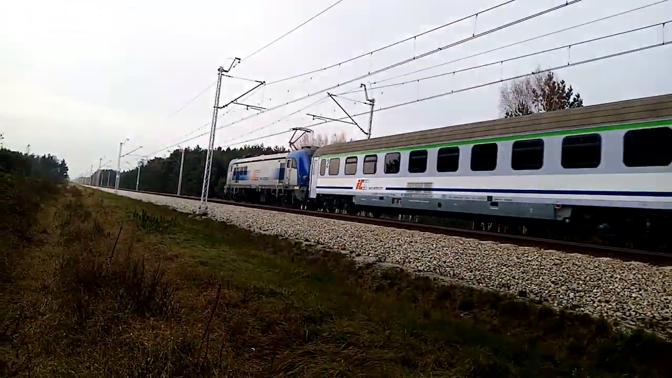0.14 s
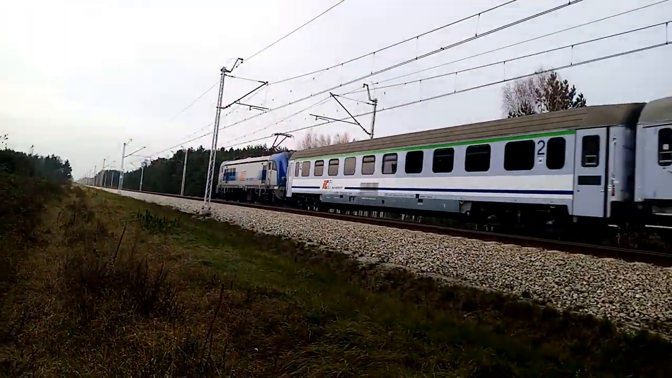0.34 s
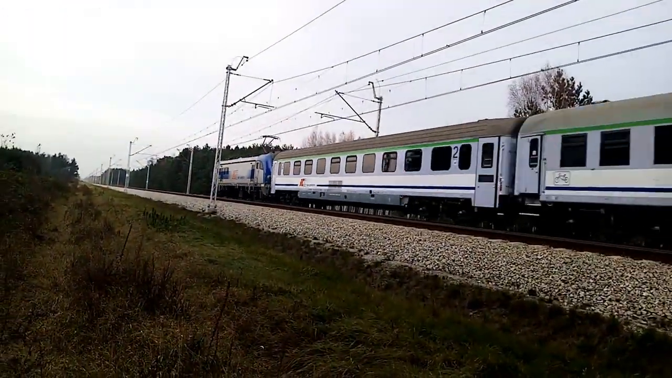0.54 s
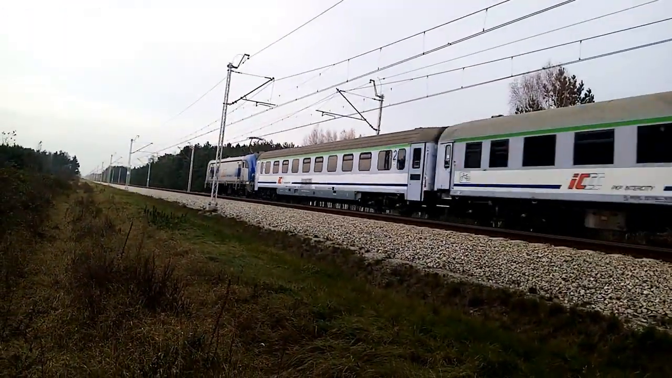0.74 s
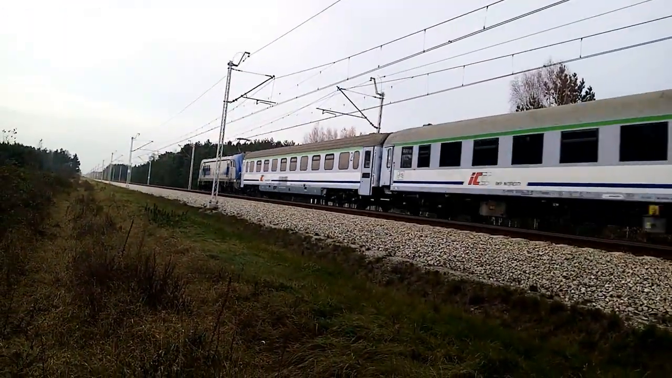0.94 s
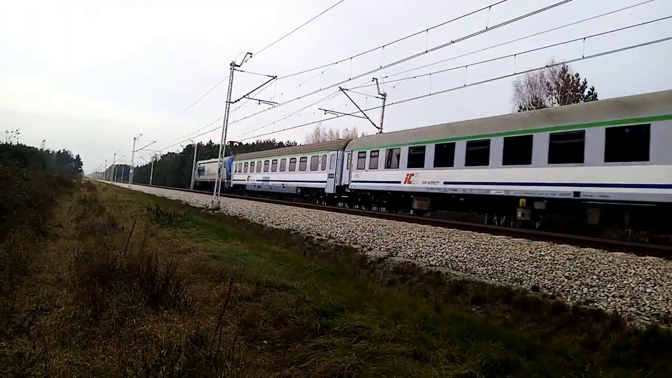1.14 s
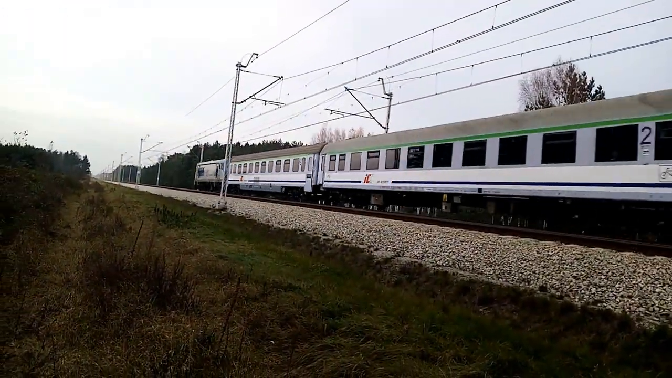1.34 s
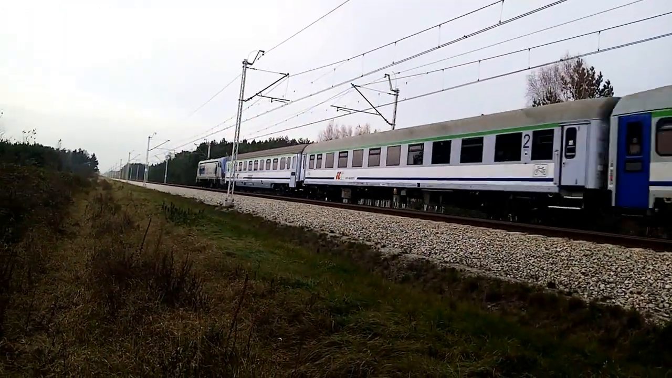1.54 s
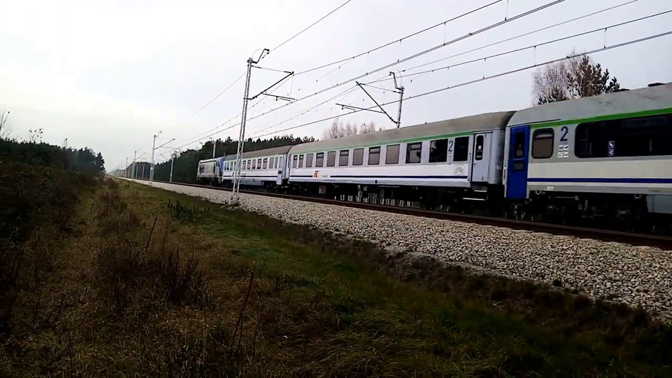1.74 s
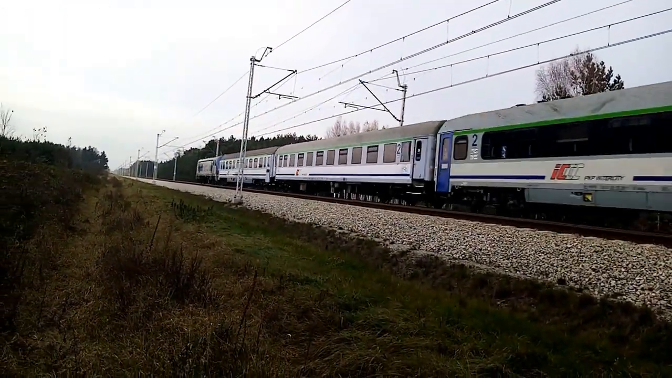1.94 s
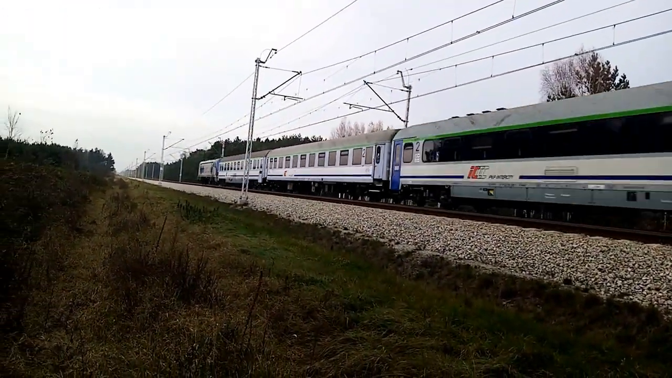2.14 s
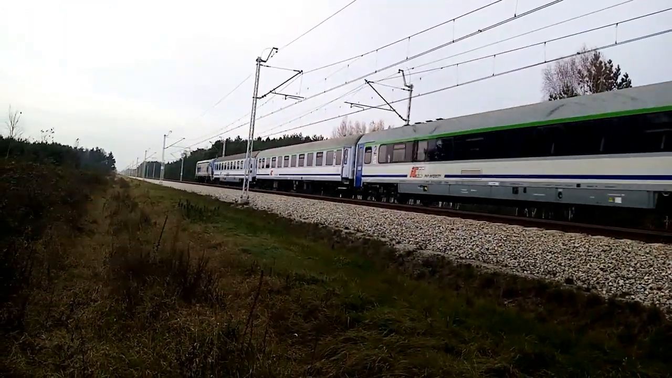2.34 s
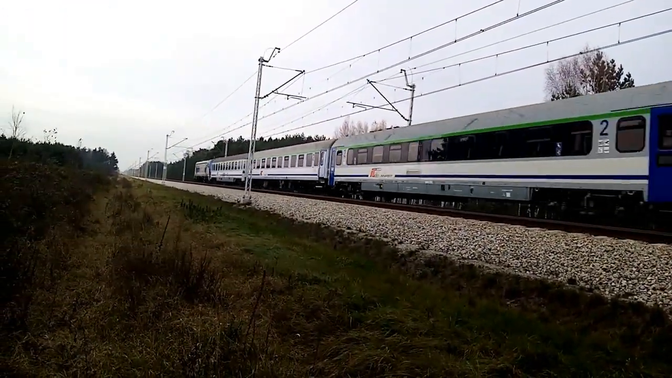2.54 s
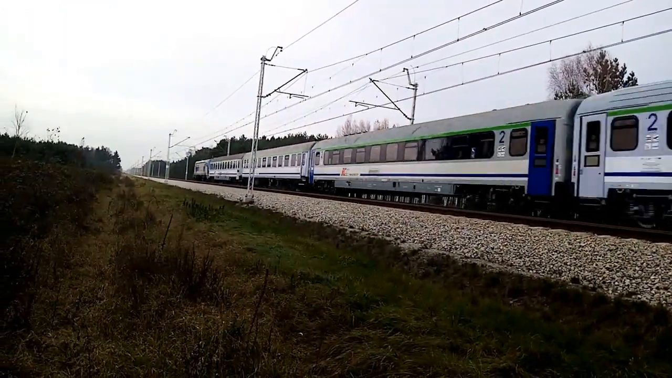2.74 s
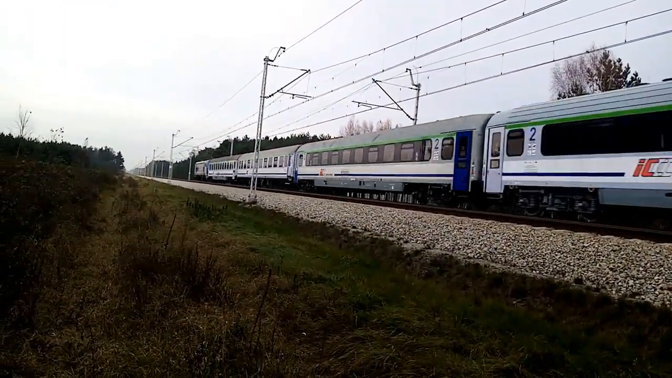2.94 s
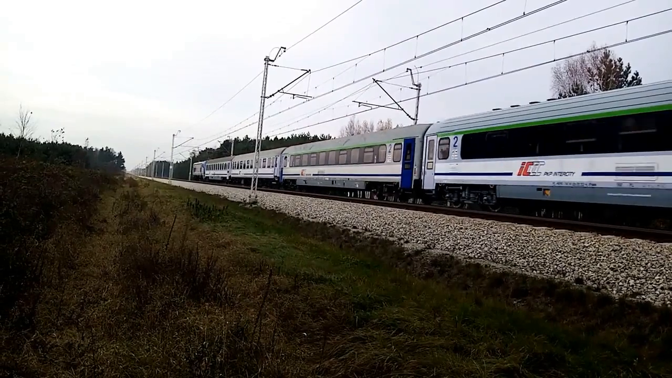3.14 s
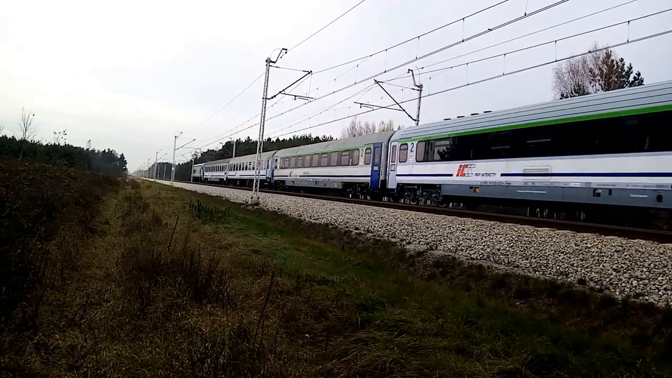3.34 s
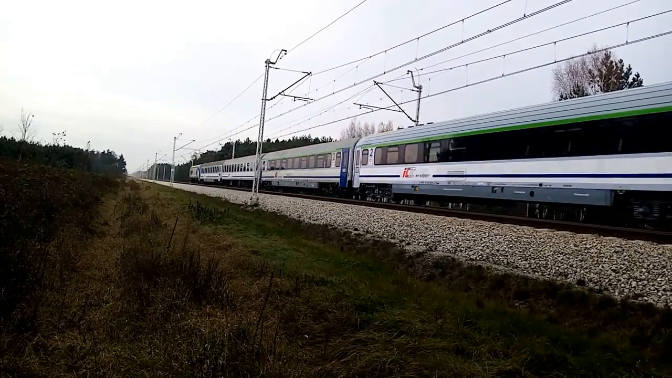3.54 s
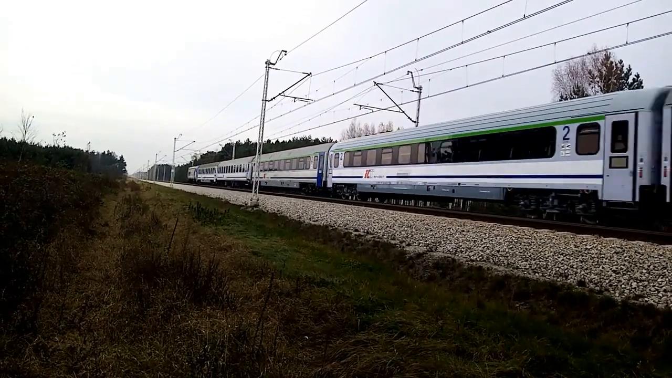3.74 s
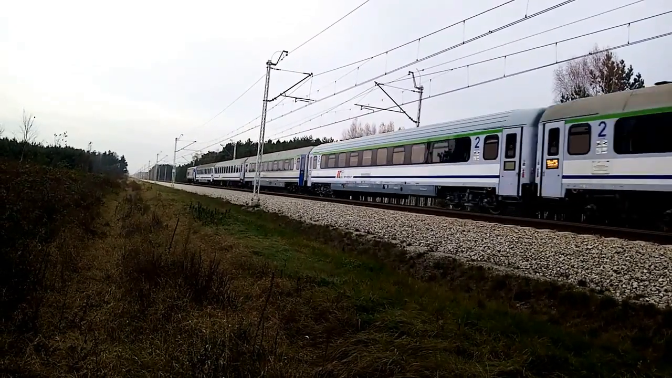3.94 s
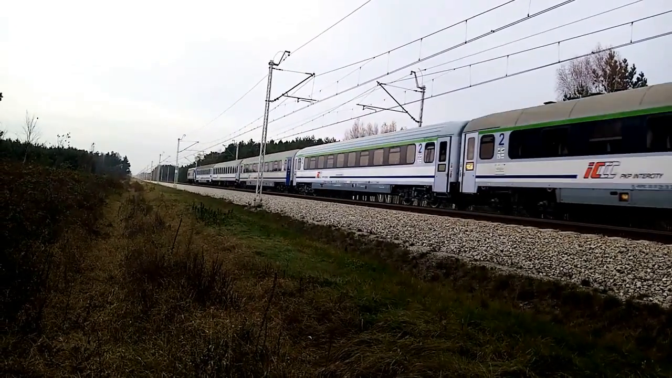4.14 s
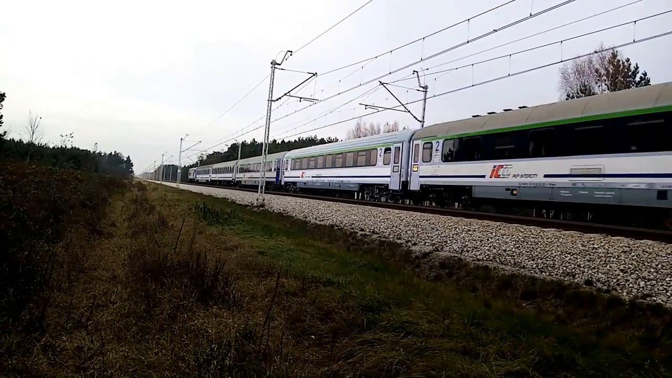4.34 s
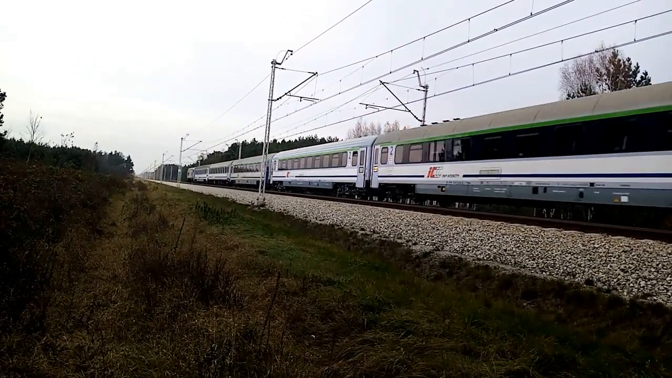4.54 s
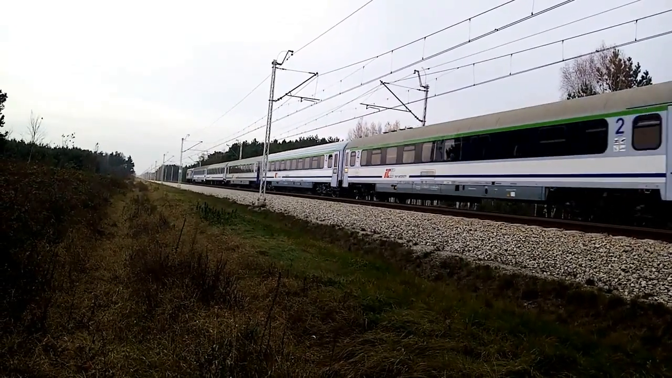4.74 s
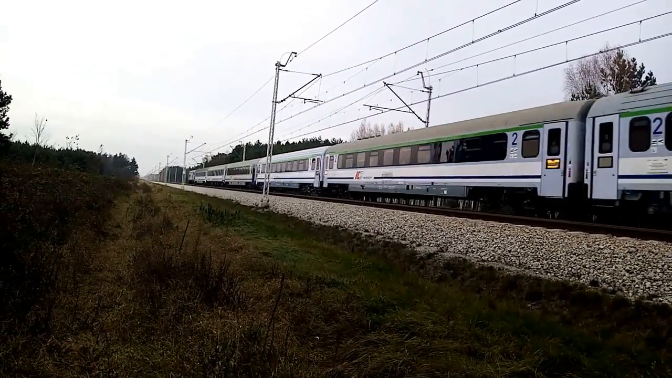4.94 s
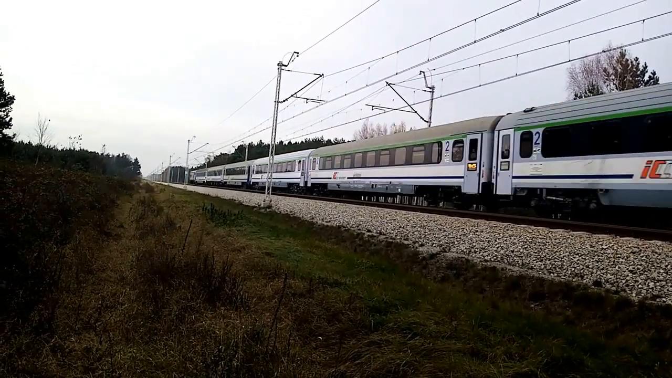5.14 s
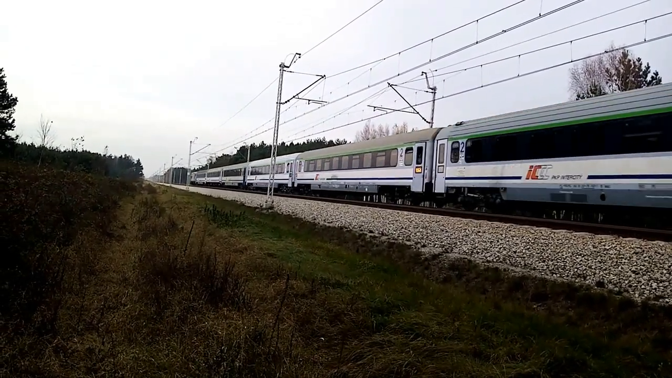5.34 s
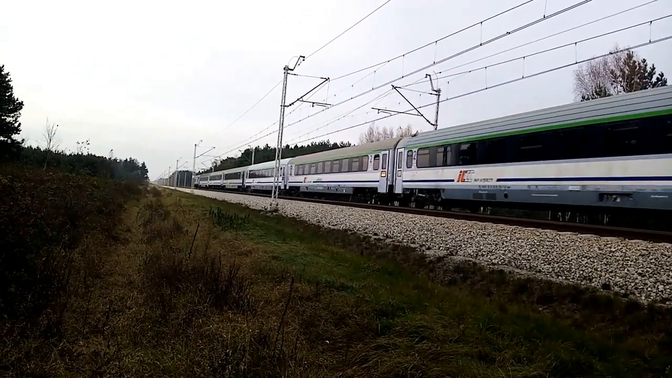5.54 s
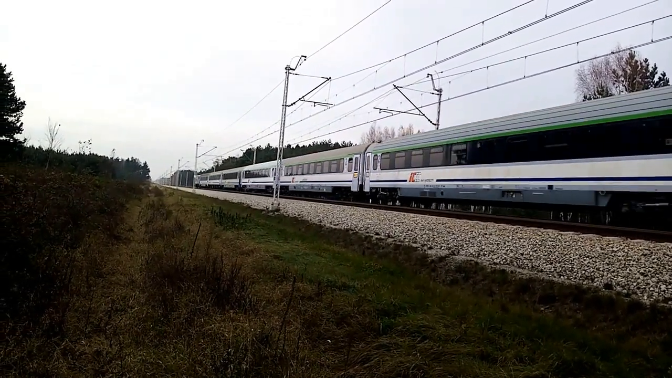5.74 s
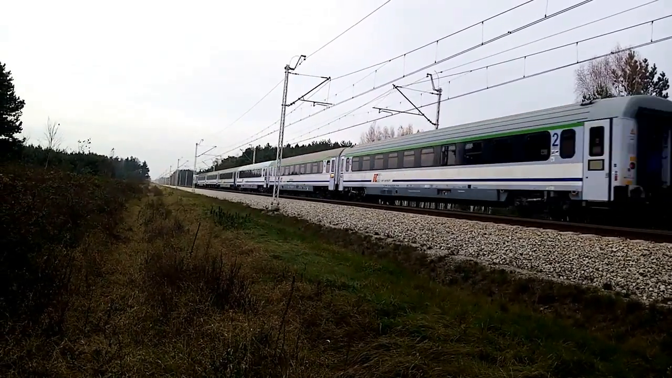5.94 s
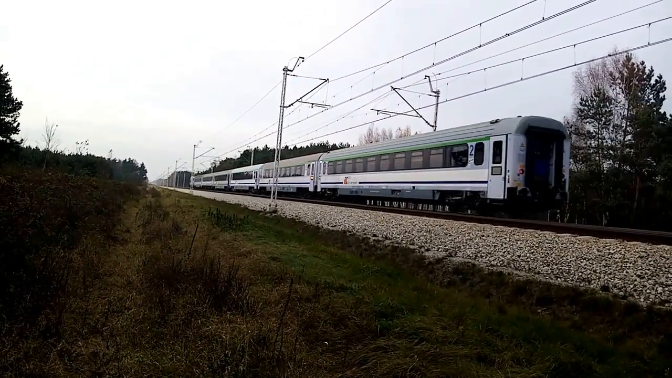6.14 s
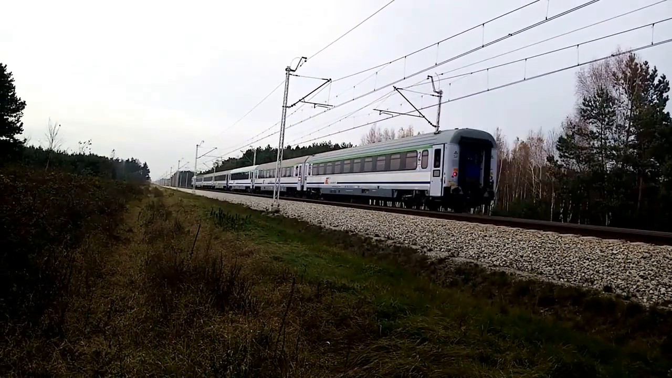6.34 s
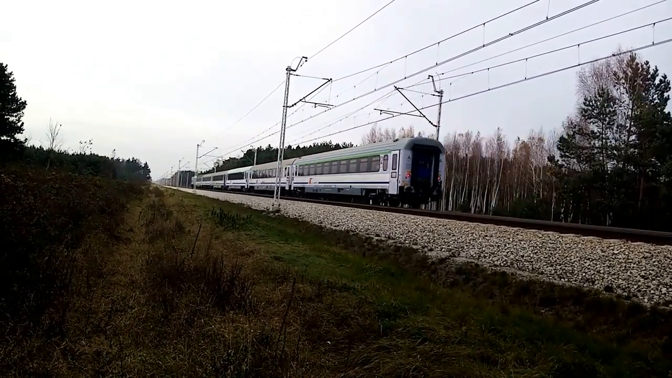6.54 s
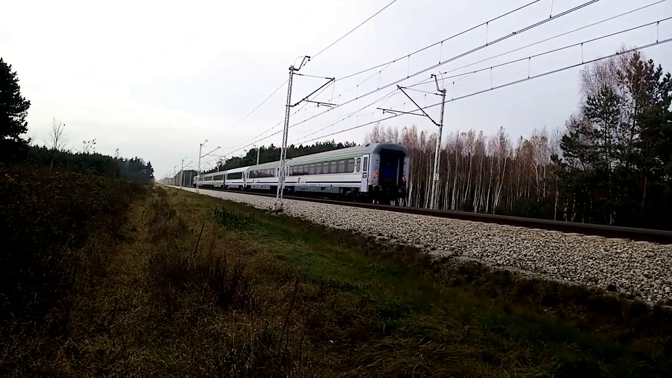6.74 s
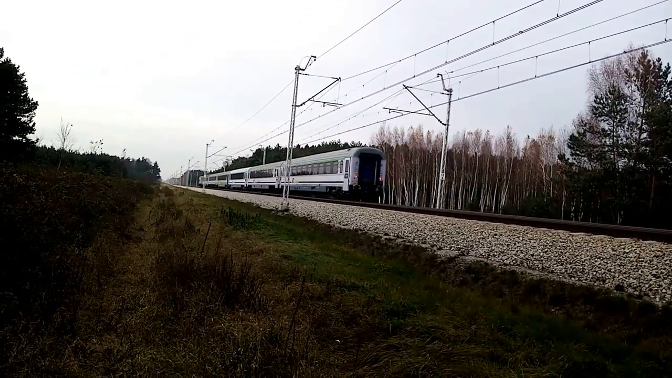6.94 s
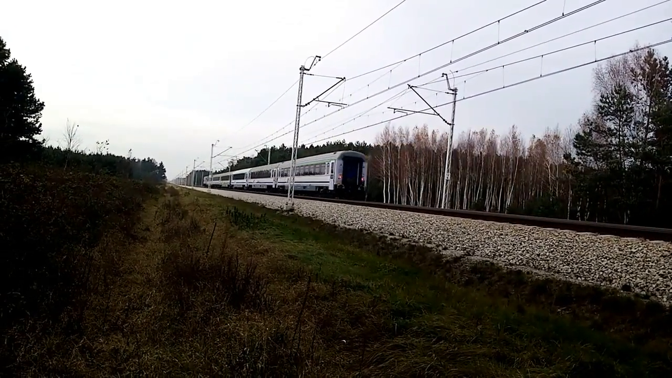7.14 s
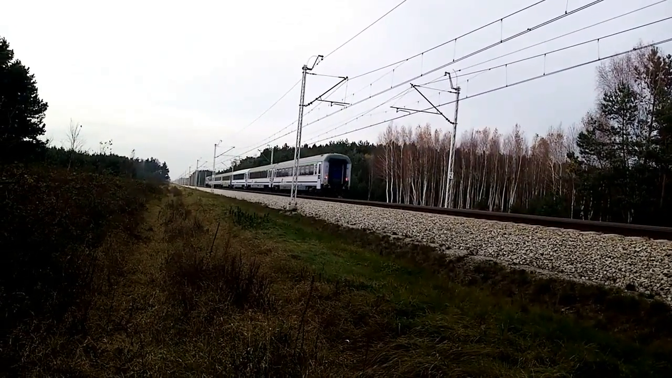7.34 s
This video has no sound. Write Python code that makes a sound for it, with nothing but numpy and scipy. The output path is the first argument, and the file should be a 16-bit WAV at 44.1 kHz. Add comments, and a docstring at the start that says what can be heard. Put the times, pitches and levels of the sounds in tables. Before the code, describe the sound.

From a fixed trackside spot in open country, one microphone hears coach after coach rush by. Low body rumble, midrange rail roar and sharp wheel hiss carry wavering metallic whines and short falling rings. Squeals crowd together just before the tail passes, then the sound turns smooth and distant, with dragged air, a lingering rail tone and one dull knock as it recedes.

```python
"""Open country beside a railway: a passenger train runs past at speed, about a dozen metres away, and recedes.
Rough wheels on rough rail drive coach bodies, sleepers and rails into coloured-noise roar, with a bright hiss.
Three rail bands sing as resonances: the lower two glide, the highest holds a steady pitch. Wheels ring as short
tones with a falling Doppler glide. Thin resonant whines and a rail tone hang around the roar. A smoother, duller
roar then fades behind the tail, with a soft gust of dragged air and one dull thump."""
import sys
import numpy as np
from scipy import signal
from scipy.fft import rfft, irfft, next_fast_len
from scipy.io import wavfile
from scipy.ndimage import map_coordinates

SR = 44100
rng = np.random.default_rng(int(sys.argv[2]) if len(sys.argv) > 2 else 0)


def to_wav(s):
    """Save 16-bit WAV."""
    ch = np.atleast_2d(s).T  # columns
    pcm = np.round(np.clip(ch, -1, 1) * 32767)  # PCM
    wavfile.write(sys.argv[1], SR, pcm.astype(np.int16))


N = 326031
TIME = np.arange(N) / SR
TAIL_S = 5.88   # the tail of the train passes
# rings that come at random
RING_SHORTEST_S, RING_LONGEST_S, RING_SPREAD_DB = .06, .2, 2.5
# hiss of the wheel contacts before each layer's trim: (time [s], lower hiss level [dB], upper hiss level [dB])
CONTACT_HISS = [(0.0, -25.5, -25.5), (0.7, -27, -25.5), (1.2, -25, -24.5), (2.0, -25.5, -21.5),
                (2.3, -24, -23), (3.2, -25, -21.5), (3.8, -23, -23), (4.25, -23.5, -22), (4.9, -24.5, -27),
                (5.3, -25.5, -24.5), (5.75, -24, -26), (6.2, -28, -29.5), (7.39, -39, -33)]


def rolling():
    """Coach bodies rumble, sleepers drone and the rails roar, all driven by the roughness of the wheels."""
    # roughness of the rolling wheels, of which only the swing about the mean counts: (time [s], level [dB])
    roughness = [(0.0, -20.5), (0.55, -18), (0.9, -20.0), (3.0, -20.5), (3.5, -22), (4.4, -22.5),
                 (5.0, -26.5), (5.85, -24.5), (6.4, -27), (7.39, -27.5)]
    # colour of the coach bodies: (frequency [Hz], relative density [dB per Hz])
    body_colour = [(20, -32), (40, -19), (65, -9), (95, 0), (120, -4.5), (170, -8), (205, -7), (238, -1),
                   (275, -7), (400, -6)]
    # colour of the sleepers: (frequency [Hz], relative density [dB per Hz])
    sleeper_colour = [(200, -12), (320, -12.5), (380, -4.5), (440, -0.5), (560, 0.5), (650, -1.5),
                      (850, -28)]
    # colour of the rails: (frequency [Hz], relative density [dB per Hz])
    rail_colour = [(450, -26), (630, -6), (735, 0.5), (850, -1), (1000, -2.5), (1130, -10), (1260, -14.5),
                   (1450, -7.5), (1750, -2), (2150, -7.5), (2400, -18), (3000, -19)]
    rough_db, = in_time(roughness)
    body_gain = following(rough_db, level_db=-37.5, follows=0.14)
    body = body_gain * noise(body_colour, flutter_db=1.0, flutter_rate=14)
    sleeper_gain = following(rough_db, level_db=-32, follows=1.32)
    sleepers = sleeper_gain * noise(sleeper_colour, flutter_db=0.3, flutter_rate=22)
    roar_gain = following(rough_db, level_db=-20, follows=0.99)
    roar = roar_gain * noise(rail_colour, flutter_db=.5, flutter_rate=14)
    return body + sleepers + roar


def contact_hiss():
    """Fine roughness in the contact patches hisses in three layers; the top edge swings most in level."""
    # colour of the lower hiss: (frequency [Hz], relative density [dB per Hz])
    hiss_colour = [(1400, 5), (2200, 0), (2550, 0.5), (2900, 2), (3250, 0), (4000, 0), (4400, -2),
                   (5000, -13.5), (6000, -38)]
    # colour of the upper hiss: (frequency [Hz], relative density [dB per Hz])
    sizzle_colour = [(3600, -33), (4400, -4.5), (4750, 0), (5200, 1), (5700, -2.5), (6600, -2), (7300, -9),
                     (8000, -10), (9000, -38)]
    # colour of the top edge: (frequency [Hz], relative density [dB per Hz])
    edge_colour = [(5500, -13.5), (6800, -6.5), (7400, -2.5), (8000, -10), (8600, -10), (9100, -19),
                   (9600, -26), (11500, -33), (13700, -43), (15500, -36)]
    hiss_db, sizzle_db = in_time(CONTACT_HISS)
    hiss = from_db(hiss_db + 3.5) * noise(hiss_colour, flutter_db=1.32, flutter_rate=18)
    sizzle = from_db(sizzle_db - 1) * noise(sizzle_colour, flutter_db=1.05, flutter_rate=26)
    edge_gain = following(sizzle_db, level_db=-36, follows=1.5)
    edge = edge_gain * noise(edge_colour, flutter_db=1.5, flutter_rate=23)
    return reflected(hiss + sizzle) + edge


def reflected(x):
    """A reflection close behind the direct sound ripples its spectrum; its delay and strength grow with time."""
    early_spacing_hz, late_spacing_hz = 680, 571   # between ripples
    early_strength, late_strength = 0.053, 0.38
    moved = turn(3.79, length=0.47)
    spacing_hz = early_spacing_hz + moved * (late_spacing_hz - early_spacing_hz)
    strength = early_strength + moved * (late_strength - early_strength)
    late = map_coordinates(x, [np.arange(N) - SR / spacing_hz], order=3, mode="nearest")
    return (x + strength * late) / np.sqrt(1 + strength ** 2)


def singing_rail():
    """Three bands sing; the lower two swell with every bogie and take the sinking, wandering pitch of the nearest."""
    # bogies pass, a pair at each coupling and one at the tail:
    # (time [s], low band gain [dB], low band pitch [Hz], middle band gain [dB], middle band pitch [Hz])
    bogies = [(0.021, -14, 1650, -21, 1772), (0.98, -14.5, 1542, -20.5, 2009),
              (1.952, -17.5, 1470, -22, 1989), (3.02, -17, 1462, -20, 1943),
              (3.98, -17.5, 1488, -18.5, 1883), (5.12, -30, 1520, -21.5, 1850), (5.8, -23, 1500, -24, 1793)]
    # highest band, of which only the swing about the mean counts: (time [s], level [dB])
    top_swing = [(0.0, -28), (0.9, -27.5), (1.5, -27.5), (2.2, -26), (2.7, -23), (3.15, -25), (3.4, -28.5),
                 (4.1, -29), (4.5, -39.5), (5.5, -35), (7.39, -37.5)]
    fall_per_s, wander, wander_rate_hz = .03, .006, 2   # fall and wander are shares of the pitch
    times, low_db, low_pitches, middle_db, middle_pitches = np.transpose(bogies)

    power = np.array([passing(s) for s in times]) ** 2
    low_gain, middle_gain = np.sqrt(from_db([low_db, middle_db]) ** 2 @ power)
    # squared again, the weights favour the nearest bogie
    nearest = power ** 2 / np.sum(power ** 2, axis=0)

    # the pitch sinks fastest as the bogie passes
    glide = 1 - fall_per_s * np.tanh(TIME - times @ nearest)
    low_hz = low_pitches @ nearest * (glide + wander * drift(wander_rate_hz))
    middle_hz = middle_pitches @ nearest * (glide + wander * drift(wander_rate_hz))
    top_hz = np.full(N, 2619)   # keeps its pitch

    low = rail_band(low_hz, core_db=-8.5, core_width_hz=22, skirt_db=-5.5, skirt_width_hz=136)
    middle = rail_band(middle_hz, core_db=-7.5, core_width_hz=22, skirt_db=-4.5, skirt_width_hz=95)
    top = rail_band(top_hz, core_db=-7.0, core_width_hz=130, skirt_db=-4.5, skirt_width_hz=220)
    top_gain = following(in_time(top_swing)[0], level_db=-34, follows=1.71)
    return low_gain * low + middle_gain * middle + top_gain * top


def rail_band(centre_hz, core_db, core_width_hz, skirt_db, skirt_width_hz):
    """Two bogies at a coupling give a strand each; the many others, each shifted by its motion, a broad skirt."""
    split = .014   # share of the pitch, above and below
    strands = sum(resonance(centre_hz * (1 + side * split), core_width_hz) for side in (-1, 1)) / np.sqrt(2)
    skirt = from_db(skirt_db) * resonance(centre_hz, skirt_width_hz)
    return from_db(core_db) * strands + skirt


def passing(s):
    """Gain of a passing bogie, 1 when abreast: it falls with distance and radiates mostly sideways."""
    speed_m_per_s, track_distance_m = 24.64, 13.19
    along_m = speed_m_per_s * (TIME - s)
    return track_distance_m ** 2 / (track_distance_m ** 2 + along_m ** 2)


def wheels():
    """Some wheels squeal clearly; the others ring faintly at random, most thickly under the last coaches."""
    # clear squeals of single wheels: (time of the middle [s], length [s], pitch [Hz], rms level at the height [dB])
    squeals = [ (.02, .08, 1540, -21), (.1, .2, 2270, -28), (.11, .12, 1700, -22), (.13, .1, 1575, -24),
               (.32, .08, 1700, -20), (.45, .08, 1685, -21), (.64, .08, 1530, -21), (.77, .08, 1550, -22),
               (.82, .08, 2606, -24), (.84, .08, 2820, -28), (.92, .07, 1486, -21), (.94, .11, 1612, -21),
               (1.0, .06, 1981, -22), (1.07, .13, 2025, -24), (1.1, .2, 4720, -34), (1.42, .08, 1960, -23),
               (1.51, .08, 4650, -30), (1.81, .08, 4005, -29), (1.865, .04, 1486, -19),
               (1.91, .15, 4755, -34), (1.92, .28, 5450, -32), (1.97, .08, 3596, -29),
               (2.0, .04, 1464, -20), (2.02, .11, 6230, -30.5), (2.03, .1, 7730, -35),
               (2.14, .05, 1425, -20), (2.2, .12, 2170, -26), (2.24, .1, 5340, -32), (2.42, .14, 5140, -33),
               (2.28, .07, 6115, -31), (2.29, .06, 7623, -31), (2.42, .04, 1464, -19),
               (2.72, .16, 2560, -31), (2.94, .07, 1443, -22), (2.94, .07, 1938, -23),
               (3.04, .09, 2670, -28), (3.18, .12, 2800, -30), (3.22, .06, 1550, -21),
               (3.42, .06, 1895, -21), (3.6, .1, 1810, -24), (3.75, .15, 1335, -26), (3.91, .06, 2347, -30),
               (4.12, .09, 3530, -28), (4.14, .08, 1525, -18), (4.15, .16, 2480, -31),
               (4.32, .07, 1470, -20), (4.54, .07, 4240, -30), (4.57, .08, 7644, -39),
               (4.62, .08, 3575, -29), (4.63, .1, 4307, -27), (4.64, .1, 2929, -27), (4.66, .08, 5060, -29),
               (4.68, .08, 2800, -28), (4.77, .06, 1787, -23), (4.83, .06, 3790, -29),
               (4.89, .07, 1809, -21), (4.94, .13, 2470, -31), (5.03, .08, 6020, -35),
               (5.05, .09, 7885, -39), (5.07, .09, 4070, -27), (5.09, .08, 2864, -30),
               (5.14, .06, 5534, -31), (5.15, .08, 5168, -29), (5.15, .08, 1916, -22),
               (5.13, .09, 3460, -27.5), (5.26, .07, 3424, -26.5), (5.25, .07, 4270, -30),
               (5.38, .25, 5440, -35), (5.31, .07, 7666, -32), (5.36, .1, 4325, -25.5),
               (5.35, .06, 1766, -23), (5.36, .06, 7235, -31.5), (5.4, .1, 2800, -24),
               (5.4, .07, 6740, -32.5), (5.41, .12, 2929, -26), (5.44, .12, 3596, -27),
               (5.44, .08, 7660, -36), (5.53, .07, 4307, -31), (5.54, .07, 2347, -25),
               (5.54, .07, 2929, -28), (5.54, .07, 3811, -31), (5.55, .06, 6589, -35),
               (5.67, .05, 1809, -19), (5.61, .08, 2215, -27), (5.68, .08, 2261, -24),
               (5.69, .08, 3273, -30), (5.76, .08, 4134, -28.5), (5.78, .06, 5663, -35),
               (5.805, .04, 1780, -18.5), (5.82, .11, 3424, -26.5), (5.87, .1, 3510, -27),
               (5.91, .05, 1790, -17.5), (5.99, .1, 4180, -34), (5.86, .2, 1775, -27),
               (6.03, .11, 1768, -21), (6.1, .14, 2842, -35), (6.24, .15, 1790, -29)]
    out = np.zeros(N)
    for row in list(squeals) + faint_rings(count=280, level_db=-.5) + ring_cluster(count=30):
        start, sound = wheel_ring(*row)
        out[start:start + len(sound)] += sound
    return out


def wheel_ring(s, length, hz, level_db):
    """One wheel mode sings briefly and unsteadily, sinking in pitch as the wheel moves; returns start and sound."""
    doppler_fall_per_s = .08   # share of the pitch
    start, stop = np.clip([int((s - 2 * length) * SR), int((s + 2 * length) * SR)], 0, N)
    age = TIME[start:stop] - s
    # random curves through this many points in two seconds, from fast to slow
    jitter, grip, waver = [np.interp(age, np.linspace(-1, 1, count), rng.standard_normal(count))
                           for count in (700, 160, 36)]
    pitch = hz * (1 - doppler_fall_per_s * age + .0025 * waver) + .37 * np.sqrt(hz) * jitter
    # the wheel's grip on the rail varies, so the tone stutters
    strength = from_db(level_db) * np.exp(-2 * (age / length) ** 2) * (1 + .33 * grip)
    return start, strength * np.sqrt(2) * np.sin(2 * np.pi * np.cumsum(pitch) / SR)


def faint_rings(count, level_db):
    """Many wheels ring faintly at any pitch, their level following the contact hiss; rows like the squeals."""
    # strongest faint rings against the hiss, before the overall trim: (pitch [Hz], level [dB])
    ring_colour = [(2200, -8), (3500, -9), (5000, -10), (6600, -12), (7900, -21)]
    hiss_db = in_time(CONTACT_HISS)[0]
    hz, db = np.transpose(ring_colour)
    when, span, place, weakness = rng.random((count, 4)).T
    at = (when * N).astype(int)
    pitch = hz[0] + place * (hz[-1] - hz[0])
    length = RING_SHORTEST_S + span * (RING_LONGEST_S - RING_SHORTEST_S)
    ring_db = level_db + hiss_db[at] + np.interp(pitch, hz, db) - RING_SPREAD_DB * weakness
    return list(zip(at / SR, length, pitch, ring_db))


def ring_cluster(count):
    """The last wheels chatter in overlapping rings near their modes, weaker upwards; rows like the squeals."""
    # modes of the last wheels: (pitch [Hz])
    last_modes = [2300, 2790, 2930, 3300, 3440, 3590, 3820, 4080, 4320, 4580]
    from_s, until_s, scatter = 4.9, 5.7, .022   # scatter is a share of the pitch, up or down
    when, span, shift, weakness = rng.random((count, 4)).T
    pitch = np.resize(last_modes, count) * (1 + scatter * (2 * shift - 1))
    length = RING_SHORTEST_S + span * (RING_LONGEST_S - RING_SHORTEST_S)
    level_db = -32 - RING_SPREAD_DB * weakness - 10 * np.log10(pitch / last_modes[0])
    return list(zip(from_s + when * (until_s - from_s), length, pitch, level_db))


def whines():
    """Modes that many wheels share swell and fade at a steady pitch, above a narrow low tone of the rail."""
    # long thin whines: (time of the middle [s], length [s], pitch [Hz], width [Hz], rms level at the height [dB])
    shared_modes = [(1.55, .9, 4725, 50, -34), (1.1, 1.3, 5160, 45, -40), (1.9, 1.8, 6630, 66, -37),
                    (0.94, .9, 4060, 40, -39), (6.2, .7, 2850, 47, -39), (6.8, 1.3, 7270, 25, -50),
                    (6.9, .8, 4000, 35, -46)]
    # rail tone inside the roar, lingering behind the train: (time [s], level [dB])
    rail_tone_level = [(0.0, -32.5), (3.0, -30), (4.8, -40), (5.7, -33), (6.3, -33.5), (7.39, -42)]
    shimmer = sum(from_db(db) * swell(s, length) * resonance(np.full(N, hz), width)
                  for s, length, hz, width, db in shared_modes)
    tone = from_db(in_time(rail_tone_level)[0]) * resonance(np.full(N, 750), width_hz=28)
    return shimmer + tone


def receding():
    """From behind, all the wheels merge into one smooth, duller roar that fades steadily."""
    # colour of the far train below the valley between rail bands: (frequency [Hz], relative density [dB per Hz])
    far_low = [(30, -23), (60, -11.5), (90, -12), (130, -20.5), (175, -13.5), (240, -21), (300, -26),
               (380, -15), (520, -13.5), (640, -7.5), (745, -2.5), (860, -2.5), (1020, -0.5)]
    # its colour above that valley: (frequency [Hz], relative density [dB per Hz])
    far_high = [(1170, -9), (1330, -1), (1500, -0.5), (1660, -7.5), (1830, 1), (2100, -8), (2600, -11),
                (2880, -10.5), (3150, -11), (3420, -11), (4700, -20), (5350, -19), (6000, -26), (7300, -18),
                (8100, -38)]
    fade_db_per_s = 2.5
    level_db = -20 - fade_db_per_s * np.maximum(TIME - TAIL_S, 0)
    return from_db(level_db) * noise(far_low + far_high, flutter_db=0.5, flutter_rate=10)


def wake(level_db, arrives_s, lasts_s):
    """Air dragged along behind the last coach reaches the microphone as a soft low gust."""
    # frequency [Hz], relative density [dB per Hz]
    gust = noise([(20, -7), (45, -4), (80, 8), (160, -11)], flutter_db=2.0, flutter_rate=5.5)
    return from_db(level_db) * swell(arrives_s, lasts_s) * gust


def thump():
    """A dull knock: a low sine under a bell a few milliseconds long."""
    # one soft thump: (time [s], level [dB], pitch [Hz], length [s])
    knock = (6.550, -23.5, 225, .003)
    s, level_db, hz, length = knock
    return from_db(level_db) * swell(s, length) * np.sin(2 * np.pi * hz * (TIME - s))


def noise(spectrum, flutter_db, flutter_rate):
    """Noise of the given colour whose level flutters by chance; rms 1."""
    hz, db = np.transpose(spectrum)
    size = next_fast_len(N)
    log_hz = np.log(np.maximum(np.arange(size // 2 + 1) * SR / size, 1))
    # beyond the ends of the table the colour falls steeply
    outside = np.abs(log_hz - np.clip(log_hz, np.log(hz[0]), np.log(hz[-1])))
    gain = from_db(np.interp(log_hz, np.log(hz), db) - 50 * outside)
    coloured = irfft(rfft(rng.standard_normal(size)) * gain, size)[:N]
    return rms_one(coloured * from_db(flutter_db * drift(flutter_rate)))


def resonance(centre_hz, width_hz):
    """A resonance driven by random roughness: a tone of wandering strength and phase; rms about 1."""
    phase = 2 * np.pi * np.cumsum(centre_hz) / SR
    return drift(width_hz) * np.cos(phase) + drift(width_hz) * np.sin(phase)


def drift(rate):
    """Slow chance: noise at every 20th sample, low-passed twice at the rate in Hz; spread about 1."""
    r = np.exp(-2 * np.pi * rate * 20 / SR)
    raw = rng.standard_normal(N // 20 + 4002)
    slow = signal.lfilter([1], [1, -2 * r, r * r], raw)[4000:]   # drop the filter's run-in
    return np.interp(np.arange(N) / 20, np.arange(len(slow)), rms_one(slow))


def following(control_db, level_db, follows):
    """Gain of a layer that moves by a multiple of a control's swing about its mean."""
    return from_db(level_db + follows * (control_db - control_db.mean()))


def swell(s, length):
    """A bell-shaped rise and fall around a moment."""
    return np.exp(-2 * ((TIME - s) / length) ** 2)


def turn(s, length):
    """A smooth step from 0 to 1 around a moment."""
    return .5 + .5 * np.tanh((TIME - s) / (2 * length))


def in_time(rows):
    """The columns of a curve at every sample."""
    s, *columns = np.transpose(rows)
    return [np.interp(TIME, s, c) for c in columns]


def from_db(db):
    """Decibels to gain."""
    return 10 ** (np.asarray(db) / 20)


def rms_one(x):
    """Scale to rms 1."""
    return x / np.sqrt(np.mean(np.abs(x) ** 2) + 1e-20)


def scene():
    """All sounds meet at one microphone; behind the tail the near sound largely gives way to the far one."""
    far_share = 0.78 * turn(TAIL_S, length=0.29)   # share of the power
    near = np.sqrt(1 - far_share) * (rolling() + contact_hiss() + singing_rail() + wheels())
    far = np.sqrt(far_share) * receding()
    gust = wake(level_db=-48.0, arrives_s=5.84, lasts_s=0.86)
    return (near + far + whines() + gust + thump())[None, :]


def record(dry):
    """The highest peaks are squashed under a ceiling, then a steep low-pass cuts the top."""
    ceiling, hardness, cutoff_hz = .68, 28, 15800
    squashed = dry / (1 + np.abs(dry / ceiling) ** hardness) ** (1 / hardness)
    low_pass = signal.ellip(10, .1, 80, cutoff_hz, fs=SR, output="sos")
    return signal.sosfilt(low_pass, squashed)


dry = scene()
out = record(dry)
to_wav(out)
```